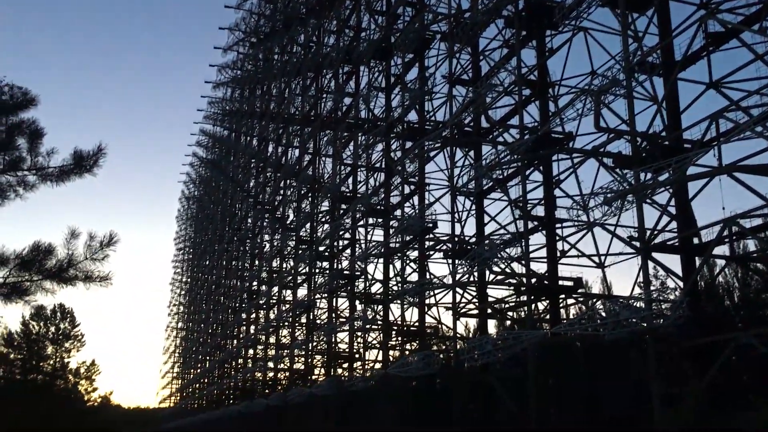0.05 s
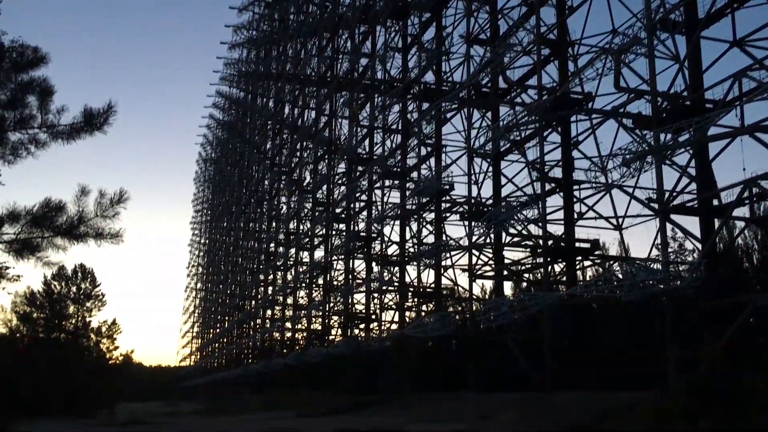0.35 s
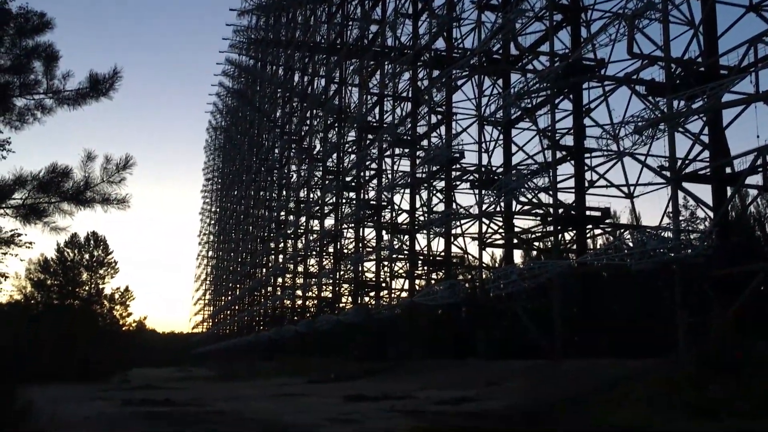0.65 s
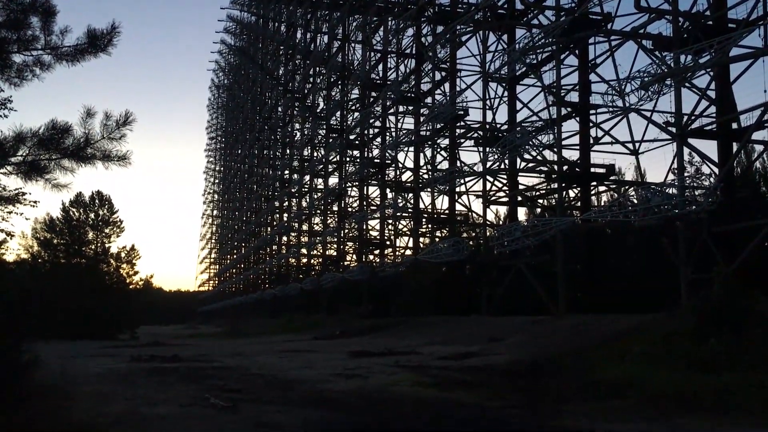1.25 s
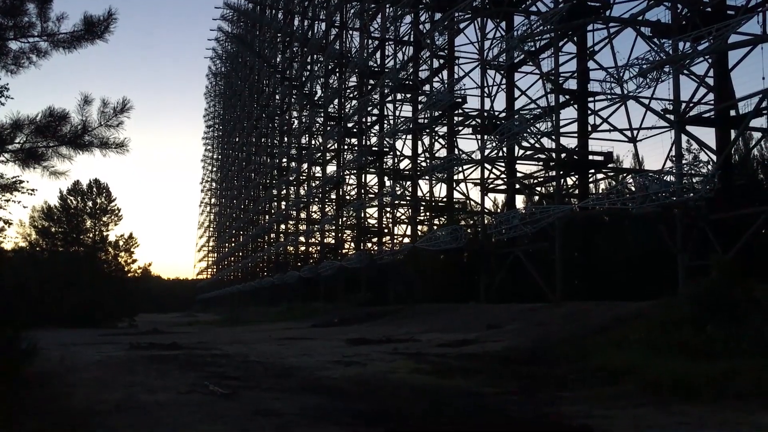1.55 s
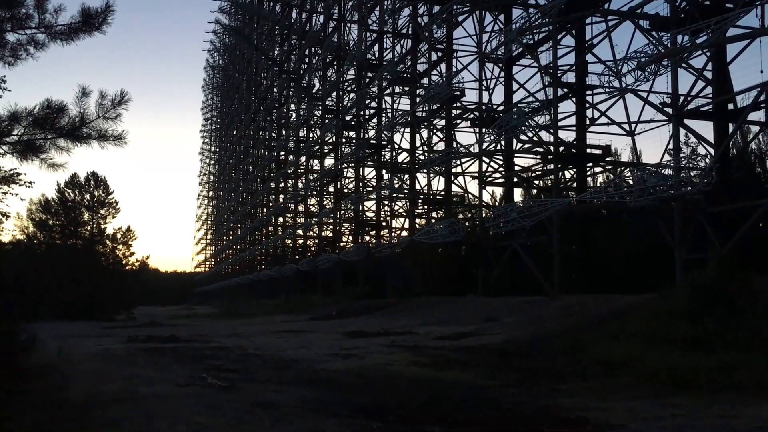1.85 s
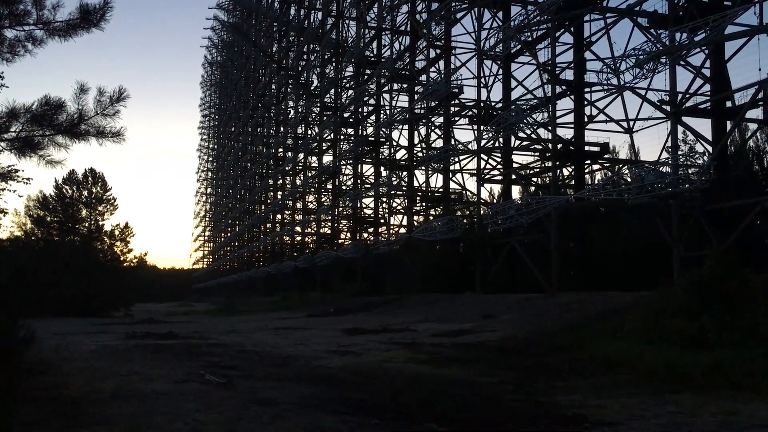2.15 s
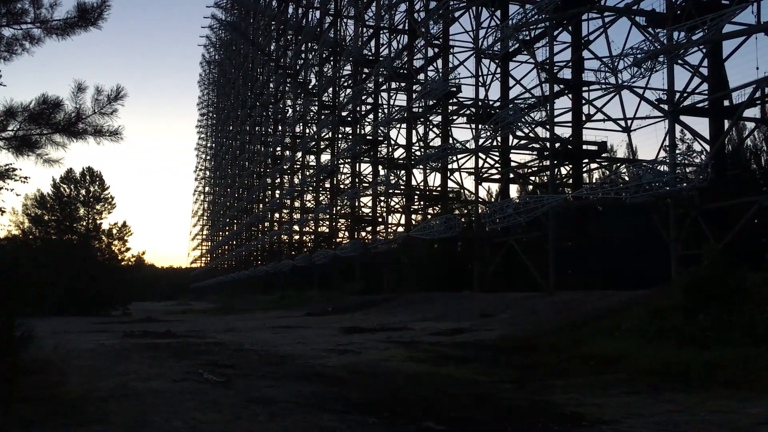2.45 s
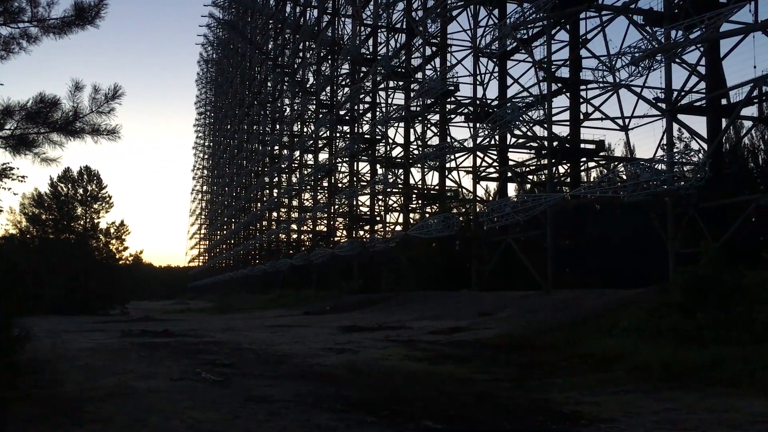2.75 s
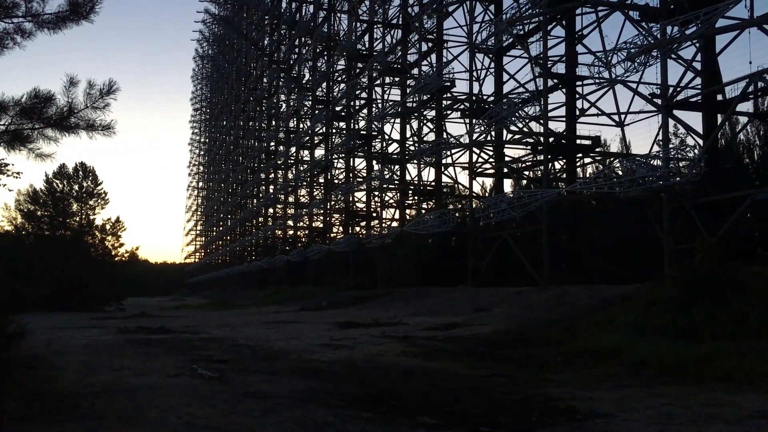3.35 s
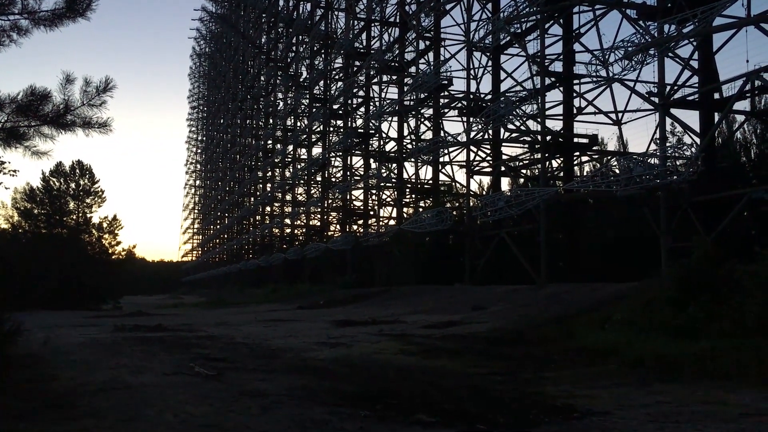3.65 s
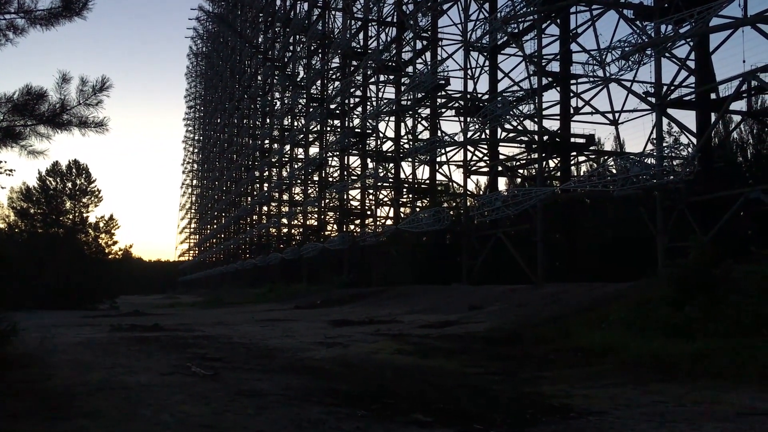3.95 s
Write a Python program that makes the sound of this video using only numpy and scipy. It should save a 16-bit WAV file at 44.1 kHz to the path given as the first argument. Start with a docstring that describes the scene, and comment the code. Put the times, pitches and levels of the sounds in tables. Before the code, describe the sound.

Wind rumbles and hums through a huge steel lattice mast, with faint ticks close by.

```python
"""At the foot of a huge steel lattice mast at dusk, pines around, one microphone on the ground.
From the start wind rumbles and drones in the girders, eddies off the bars sound two wavering hums,
and the distant pines hiss. Soft rustles, scuffs and tiny snaps come close by, then a dry tick at 1.4 s.
Near 2.5 s the lower hum sinks away and two more snaps follow. It swells back after 3.2 s,
among more rustles and scuffs, with a second tick at 3.7 s."""
import sys
import numpy as np
from scipy import signal
from scipy.fft import rfft, irfft
from scipy.io import wavfile
from scipy.ndimage import uniform_filter1d

SR = 44100
rng = np.random.default_rng(int(sys.argv[2]) if len(sys.argv) > 2 else 0)


def store_pcm(level_fs):
    """Save levels as 16-bit WAV."""
    pcm = np.round(np.clip(level_fs, -1, 1) * 32767).astype(np.int16)
    wavfile.write(sys.argv[1], SR, np.atleast_2d(pcm).T)


N = 176400

# Spectra of the wind in the mast overhead (f/Hz, relative level/dB)
BUFFET_SPECTRUM = [(18, -34), (30, -8), (46, 1), (62, 3), (85, -20)]  # deepest push of the gusts
RUMBLE_SPECTRUM = [(30, -32), (55, -4), (75, 4.5), (115, 5.5), (145, 1), (175, -8), (215, -5.5), (400, -44)]  # the girders
DRONE_SPECTRUM = [(150, -11), (205, -5.5), (245, 0), (268, 5), (290, 1.5), (325, -1.5), (360, -7.5),
                  (420, -17.5), (600, -44)]  # the thinner bars
# How each voice of the mast swells with the gusts, before its trim (t/s, level/dB)
BUFFET_GUSTS = [(0.0, -46), (0.19, -40), (0.4, -41.5), (0.57, -37), (0.63, -59), (0.71, -31.5), (0.88, -49),
                (0.9, -37.5), (1.59, -43.5), (1.64, -56), (1.73, -38), (1.92, -35), (1.96, -56),
                (2.04, -28), (2.07, -47), (2.21, -37), (2.26, -55), (2.41, -33), (2.47, -53), (3.02, -33.5),
                (3.06, -43), (3.41, -48), (3.43, -36), (3.71, -51), (3.97, -40), (4.0, -52)]
RUMBLE_GUSTS = [(0.0, -38), (0.15, -33), (0.21, -35), (0.3, -34), (0.41, -43), (0.5, -39), (0.8, -39.5),
                (0.98, -32.5), (1.2, -34), (1.75, -35), (1.98, -37), (2.15, -34), (2.26, -38), (2.39, -33),
                (2.48, -44.5), (2.58, -40), (2.65, -31.5), (2.88, -35), (2.95, -36), (3.02, -32),
                (3.28, -36), (3.56, -32.5), (3.79, -37), (3.86, -46), (3.91, -33.5), (4.0, -34.5)]
DRONE_GUSTS = [(0.0, -33), (0.09, -35), (0.21, -40), (0.33, -37), (0.4, -32.5), (0.48, -39.5), (0.55, -33),
               (0.79, -40.5), (1.08, -36.5), (1.43, -37.5), (1.75, -37.5), (1.97, -39), (2.22, -35),
               (2.42, -37), (2.48, -44), (2.56, -37.5), (2.9, -38.5), (3.0, -34), (3.07, -41.5),
               (3.14, -31.5), (3.25, -39.5), (3.38, -38), (3.9, -39), (4.0, -31)]
LOW_HUM_GUSTS = [(0.08, -39), (0.14, -43), (0.24, -32), (0.34, -32), (0.44, -44.5), (0.75, -39.5),
                 (1.11, -30.5), (1.19, -41), (1.32, -27), (1.5, -39), (1.6, -30.5), (1.98, -38.5),
                 (2.38, -35.5), (2.49, -55), (2.7, -50), (3.2, -55), (3.31, -44), (3.39, -28.5),
                 (3.56, -36.5), (3.72, -27), (3.9, -54)]
HIGH_HUM_GUSTS = [(0.0, -45), (0.37, -51.5), (0.4, -29), (0.48, -38.5), (0.99, -46.5), (1.04, -32.5),
                  (1.15, -58), (1.19, -35.5), (1.7, -36), (1.82, -49), (1.93, -33), (2.22, -50),
                  (2.42, -32.5), (2.46, -53), (2.52, -39.5), (2.96, -35.5), (2.99, -33.5), (3.14, -55),
                  (3.17, -42), (3.26, -56), (3.4, -28.5), (3.44, -49), (3.63, -32), (3.68, -61), (3.7, -41),
                  (3.89, -34.5), (3.91, -37), (4.0, -44)]

# Soft rustles near the microphone (centre t/s, length/s, level/dB, treble share/dB)
RUSTLE_SWELLS = [(0.335, 0.042, -55.5, -21), (.63, 0.3, -60, -7), (1.005, 0.07, -54.5, -11),
                 (1.115, 0.15, -56, -11), (3.17, 0.05, -49.5, -14), (3.335, 0.027, -54, -14)]
# Scuffs, higher and drier (centre t/s, length/s, level/dB)
SCUFF_SWELLS = [(.56, .045, -59), (.71, .07, -58.5), (1.14, .05, -60), (3.59, .09, -54.5),
                (3.669, .03, -55.5)]
# Dry ticks (t/s, ring peak/dB, crack peak/dB)
TICK_HITS = [(1.3601, -28.5, -36), (3.675, -35, -29.5)]
# Resonances of a tick (f/Hz, relative level/dB, t60/s)
TICK_RESONANCES = [(1590, 0, .010), (1880, -4, .009), (2280, -3, .008), (2900, -8, .004), (3600, -1, .0045)]
# Catching grit and tiny bright snaps (t/s, peak/dB)
GRIT_HITS = [(.339, -40), (.5728, -42), (.9055, -39), (1.0056, -37), (1.0157, -41), (3.1469, -36),
             (3.169, -32.5), (3.6809, -40), (3.6922, -41)]
SNAP_HITS = [(0.7106, -42), (1.0386, -43), (1.7148, -41.5), (2.719, -42), (2.884, -47), (3.7231, -40)]
# Spectra of these close sounds (f/Hz, relative level/dB)
RUSTLE_SPECTRUM = [(500, 0), (1100, 4), (2000, 3), (2800, -0.5), (4200, -6.5), (5000, -20), (9000, -38)]
RUSTLE_TREBLE_SPECTRUM = [(2500, -31), (6000, 1), (9000, -15), (15000, -4)]
SCUFF_SPECTRUM = [(900, -8), (1800, -2), (3000, -1), (4300, 1), (5000, -9), (8000, -16), (14000, -26)]
CRACK_SPECTRUM = [(500, -14), (1300, 0), (2500, -2), (3500, 0), (4200, 1.5), (5000, -9), (7500, -13),
                  (10000, -26), (16000, -38)]
GRIT_SPECTRUM = [(400, -25), (1100, -2), (2100, 0), (2800, -10), (4300, -13), (6000, -25), (16000, -45)]
SNAP_SPECTRUM = [(800, -15), (4000, 0), (14000, -1), (17000, -25)]

# Hiss of air in the distant pines (f/Hz, relative level/dB)
PINE_SPECTRUM = [(200, -1), (420, -0.5), (620, 0.5), (800, -4.5), (1200, -7.5), (2150, -12.5),
                 (2900, -20.5), (3600, -20.5), (4400, -23.5), (4850, -27.5), (5600, -26), (6800, -26.5),
                 (7600, -29), (9200, -27), (9900, -29.5), (10400, -33), (11200, -29), (15500, -33)]


def mast():
    """Wind through the steel lattice overhead: three bands of noise and two hums ride the gusts."""
    buffet = wind_band(BUFFET_SPECTRUM, even_s=0.17, trim_db=-0.5) * curve(BUFFET_GUSTS)
    rumble = wind_band(RUMBLE_SPECTRUM, even_s=0.16, trim_db=1.1) * curve(RUMBLE_GUSTS)
    drone = wind_band(DRONE_SPECTRUM, even_s=0.14, trim_db=-0.5) * curve(DRONE_GUSTS)
    low_hum = hum(hz=151.1, waver_hz=5.3, waver_rate=20.4, flutter_db=2, trim_db=-4)
    high_hum = hum(hz=312.7, waver_hz=5.45, waver_rate=12.7, flutter_db=3, trim_db=-2.3)
    return buffet + rumble + drone + low_hum * curve(LOW_HUM_GUSTS) + high_hum * curve(HIGH_HUM_GUSTS)


def wind_band(spectrum, even_s, trim_db):
    """Turbulent air on the steel: noise with its quick flutter kept, swells slower than even_s levelled."""
    rush = noise(spectrum)
    power = uniform_filter1d(rush ** 2, int(even_s * SR))
    return undb(trim_db) * rush / np.sqrt(power + 1e-9)


def hum(hz, waver_hz, waver_rate, flutter_db, trim_db):
    """Eddies shed by bars of one thickness: a tone that wavers and flutters in the turbulence."""
    phase = 2 * np.pi * np.cumsum(hz + waver_hz * wander(waver_rate)) / SR
    flutter = undb(flutter_db * wander(17))
    return undb(trim_db) * unit(np.sin(phase) * flutter)


def rustles_and_scuffs(grain_db=2):
    """Rubbing close to the microphone: short grainy swells of noise, some soft, some dry."""
    body = noise(RUSTLE_SPECTRUM)
    scuff = noise(SCUFF_SPECTRUM)
    treble = noise(RUSTLE_TREBLE_SPECTRUM)
    rustles = sum(undb(db) * swell(s, length) * (body + undb(treble_db) * treble)
                  for s, length, db, treble_db in RUSTLE_SWELLS)
    scuffs = sum(undb(db) * swell(s, length) * scuff for s, length, db in SCUFF_SWELLS)
    grain = unit(undb(grain_db * wander(150)))
    return (rustles + scuffs) * grain


def ticks(attack_s=0.0003, tail_s=0.008, tail_db=-25):
    """Dry ticks close by: a crack with a short scatter behind it rings a few damped resonances."""
    out = np.zeros(N)
    scatter = noise(CRACK_SPECTRUM)
    for s, ring_db, crack_db in TICK_HITS:
        age = np.maximum(np.arange(N) / SR - s, 0)
        ring = sum(undb(db) * np.sin(2 * np.pi * hz * age) * np.exp(-np.log(1000) * age / t60)
                   for hz, db, t60 in TICK_RESONANCES)
        ring *= 1 - np.exp(-age / attack_s)
        crack = clicks([(s, crack_db)], CRACK_SPECTRUM)
        tail = (age > 0) * undb(crack_db + tail_db) * np.exp(-age / tail_s) * scatter
        out += undb(ring_db) * peak(ring) + crack + tail
    return out


def grit_and_snaps():
    """Close by, dull grit catches in the rustles and tiny bright snaps die within a millisecond."""
    return clicks(GRIT_HITS, GRIT_SPECTRUM) + clicks(SNAP_HITS, SNAP_SPECTRUM)


def pines(level_db=-44, swell_db=0.7, flicker_db=0.72):
    """Air through the distant pines: a smooth hiss that barely stirs."""
    gain = undb(level_db + swell_db * wander(0.4) + flicker_db * wander(22))
    return gain * noise(PINE_SPECTRUM)


def clicks(rows, spectrum, size=2048):
    """Sudden contacts (t/s, peak/dB), each ringing out with a spectrum (f/Hz, level/dB)."""
    hz, db = np.array(spectrum).T
    f = np.maximum(np.arange(size // 2 + 1) * SR / size, 1)
    gain = undb(np.interp(np.log(f), np.log(hz), db))
    cepstrum = irfft(np.log(gain))
    minimum_phase = np.exp(rfft(2 * cepstrum[:size // 2], size))  # packs the energy at the onset
    response = peak(irfft(minimum_phase))
    hits = np.zeros(N)
    for s, peak_db in rows:
        hits[int(s * SR)] += undb(peak_db)
    return signal.fftconvolve(hits, response)[:N]


def noise(spectrum):
    """Noise of rms 1 with a spectrum (f/Hz, level/dB), falling steeply above the last point."""
    hz, db = np.array(spectrum).T
    f = np.maximum(np.arange(N // 2 + 1) * SR / N, 1)
    gain = undb(np.interp(np.log(f), np.log(hz), db)) * np.minimum(hz[-1] / f, 1) ** 2
    return unit(irfft(rfft(rng.standard_normal(N)) * gain, N))


def wander(rate):
    """Random drift of rms 1 that changes about rate times a second."""
    f = np.arange(N // 2 + 1) * SR / N
    lowpass = np.exp(-0.5 * (f / rate) ** 2) * (f > 0)
    return unit(irfft(rfft(rng.standard_normal(N)) * lowpass, N))


def curve(rows):
    """Gain along a table (t/s, level/dB)."""
    s, db = np.array(rows).T
    return undb(np.interp(np.arange(N) / SR, s, db))


def swell(s, length):
    """A bell-shaped rise and fall around time s."""
    return np.exp(-2 * ((np.arange(N) / SR - s) / length) ** 2)


def undb(db):
    """Decibels to gain."""
    return 10 ** (np.asarray(db) / 20)


def unit(x):
    """Scale to rms 1."""
    return x / np.sqrt(np.mean(x ** 2))


def peak(x):
    """Scale to a peak of 1."""
    return x / np.abs(x).max()


def scene():
    """From the ground, in mono: the mast overhead, the pines far off, small sounds close by."""
    return (mast() + pines() + rustles_and_scuffs() + ticks() + grit_and_snaps())[None]


def record(dry):
    """The microphone drops the bass below 22 Hz and the recorder cuts the top above 15750 Hz."""
    low_cut = signal.butter(2, 22, "high", fs=SR, output="sos")
    high_cut = signal.ellip(10, 0.1, 80, 15750, fs=SR, output="sos")
    return signal.sosfilt(high_cut, signal.sosfilt(low_cut, dry))


dry = scene()
out = record(dry)
store_pcm(out)
```